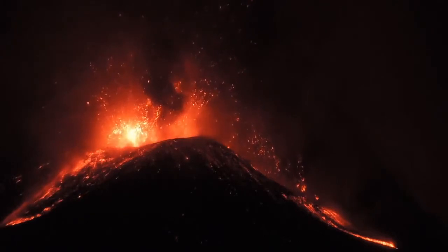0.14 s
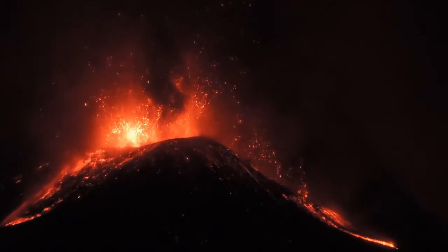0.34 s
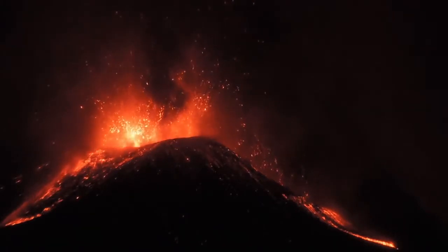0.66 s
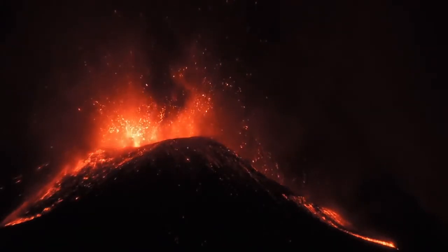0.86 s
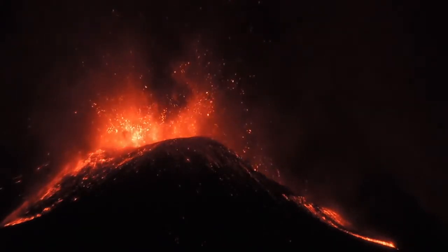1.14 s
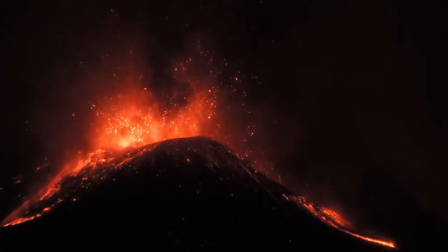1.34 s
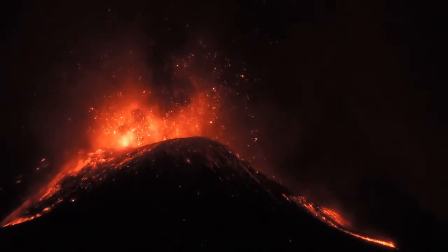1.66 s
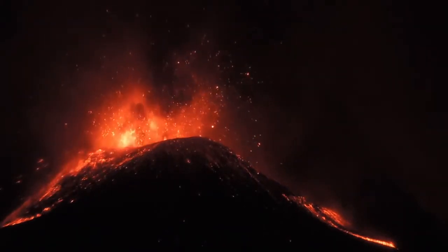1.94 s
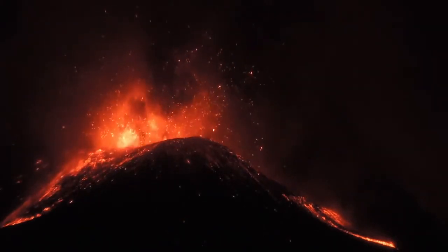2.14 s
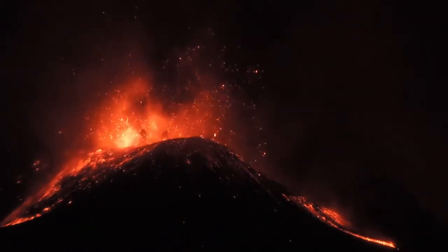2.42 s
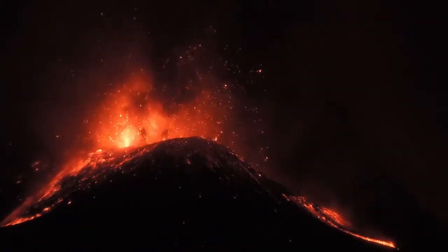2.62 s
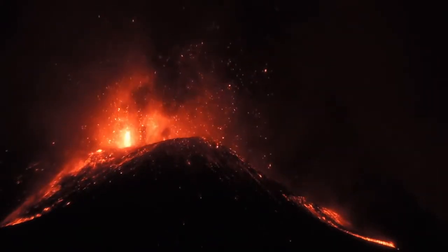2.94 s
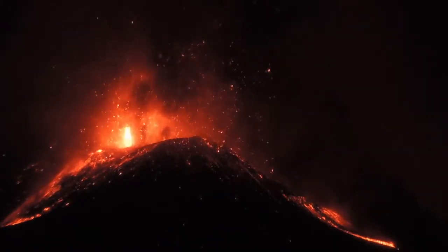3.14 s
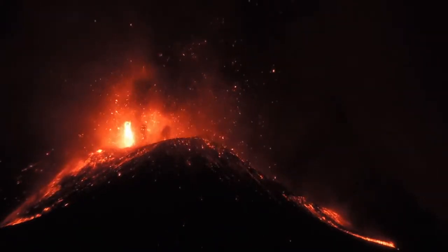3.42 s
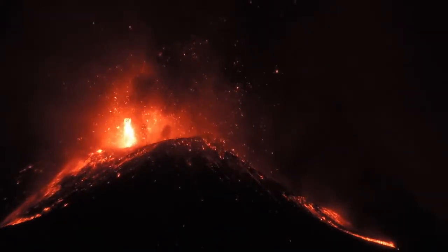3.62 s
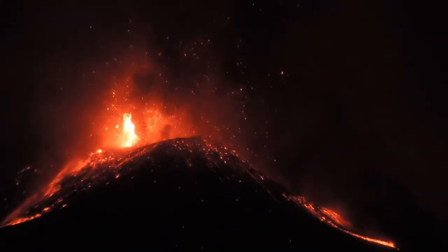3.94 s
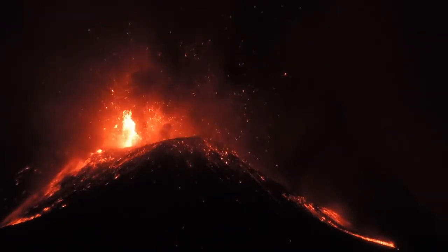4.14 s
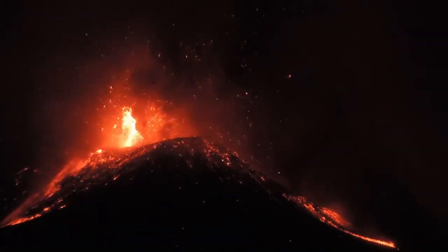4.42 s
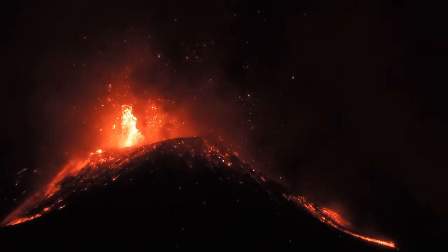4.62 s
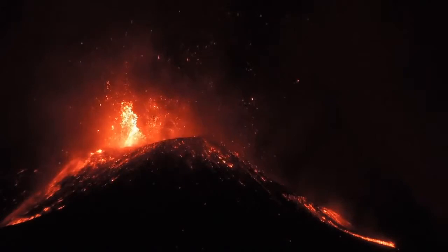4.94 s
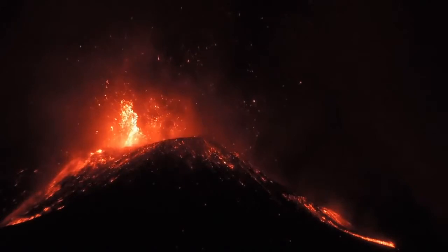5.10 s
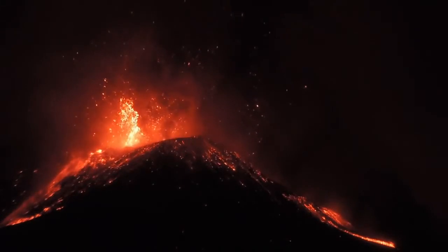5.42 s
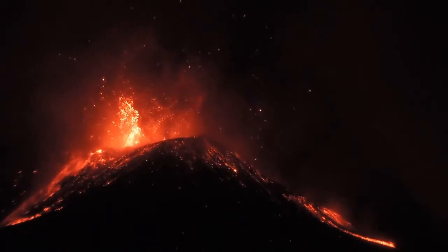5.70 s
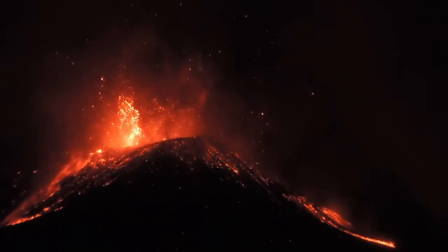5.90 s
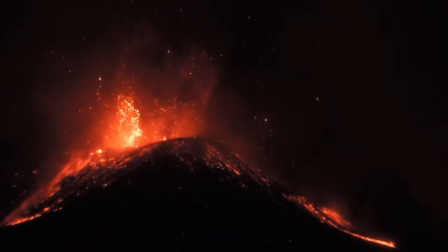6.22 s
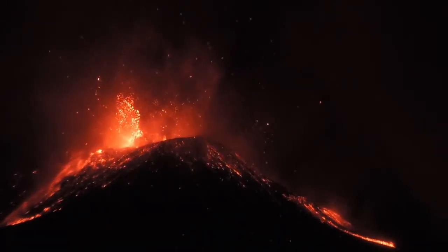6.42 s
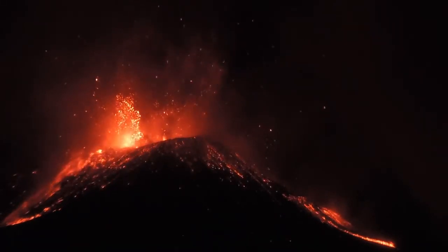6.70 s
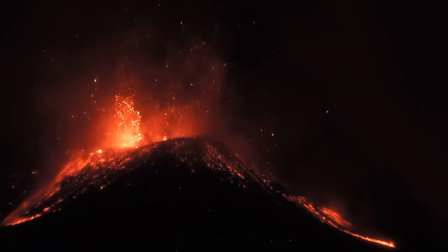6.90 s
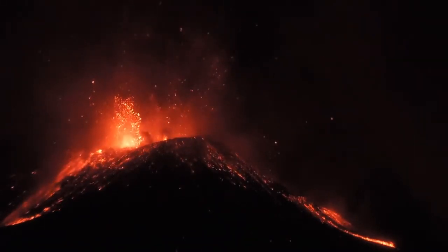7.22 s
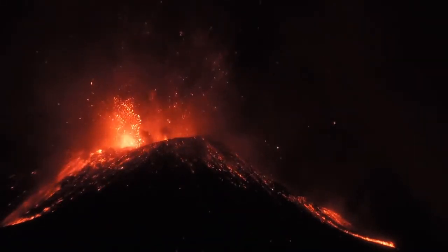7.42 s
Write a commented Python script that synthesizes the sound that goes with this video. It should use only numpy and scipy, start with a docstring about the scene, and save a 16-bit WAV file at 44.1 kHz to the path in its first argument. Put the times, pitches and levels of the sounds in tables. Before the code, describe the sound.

A distant volcano rumbles and roars in rolling low bursts, peaking in one heavy boom midway, while ash grains tick sharply close by over faint hiss.

```python
"""Out in the open at night, kilometres from an erupting volcano, on a stereo microphone.
Gas bursts in the vent, random pulses shaped by spectra, merge into a rolling rumble, a duller-than-near
jet roar and a deep swell; single booms, damped vibrations, stand out, all treble lost on the way.
Close by, grains of ash tick on the gear as short rings and snaps, mostly to the right.
Behind it all lies a fine steady hiss of noise in flickering octave bands."""
import sys
import numpy as np
from scipy import signal
from scipy.fft import rfft, irfft, next_fast_len
from scipy.io import wavfile
from scipy.ndimage import uniform_filter1d

SR = 44100
rng = np.random.default_rng(int(sys.argv[2]) if len(sys.argv) > 2 else 0)


def digitize_waveform(pressure):
    """Quantize a signal to 16-bit integers and store it at the path in sys.argv[1].

    Rows of a 2-D input are taken as channels; values are limited to [-1, 1].
    """
    field = np.atleast_2d(pressure).T
    bounded = np.clip(field, -1, 1)
    quanta = np.round(bounded * 32767).astype(np.int16)
    wavfile.write(sys.argv[1], SR, quanta)


N = 333172  # samples

# Blasts in the distant vent: peak_s, rise_s, rumble_db, roar_db, rumble_fade_db_per_s
VENT_BLASTS = [(0.06, 0.13, -43, -52, 16), (0.27, 0.24, -44.5, -72, 24), (0.71, 0.46, -40.5, -49.5, 7),
               (0.9, 0.22, -35.5, -49.5, 29), (2.14, 0.14, -46, -49, 11), (2.27, 0.18, -44, -46, 29),
               (3.13, 0.39, -48, -53.5, 12), (3.795, 0.028, -43.5, -48, 9), (3.86, 0.06, -43, -48.5, 14),
               (3.95, 0.071, -37.5, -45, 7), (4.07, 0.16, -36, -41.5, 10.5),
               (4.17, 0.063, -26.5, -36.5, 21), (4.4, 0.12, -34, -57, 17), (4.57, 0.12, -31.5, -52.5, 21),
               (4.76, 0.13, -47, -57, 18), (5.72, 0.074, -55, -56.5, 17), (5.87, 0.13, -38.5, -49.5, 19),
               (6.14, 0.34, -36, -48.5, 37), (6.36, 0.27, -39, -47.5, 21), (6.58, 0.16, -37.5, -50, 12),
               (6.78, 0.25, -37.5, -52.5, 10), (7.0, 0.15, -36, -42.5, 28), (7.15, 0.12, -51, -53.5, 9)]
RISE_DB = 13  # climb during the rise
ECHO_DB, ECHO_FADE_DB_PER_S = -15, 12.7


def surge(peak_db, calm_db, fades=1):
    """Level in dB of a layer: blasts climb, fade and echo off far slopes; powers add over a calm bed."""
    t = np.arange(0, N, 64) / SR
    power = undb(2 * calm_db)
    for (peak_s, rise_s, _, _, fade), db in zip(VENT_BLASTS, peak_db):
        age = t - peak_s
        since_peak = age.clip(0)
        direct = undb(-2 * fades * fade * since_peak)
        # the slopes' return is a weaker tail that fades at its own rate
        echo = undb(2 * (ECHO_DB - fades * ECHO_FADE_DB_PER_S * since_peak))
        climb_db = RISE_DB * np.minimum(age / rise_s, 0)
        power = power + undb(2 * (db + climb_db)) * (direct + echo)
    return np.interp(np.arange(N) / SR, t, 10 * np.log10(power))


# Spectrum of the rumble as it arrives, relative: pitch_hz, density_db (per Hz)
RUMBLE_SPECTRUM = [(21, -41), (35, -10), (77, -2.5), (97, -1), (129, -4), (168, -5.5), (199, -12),
                   (263, -19.5), (280, -27.5), (360, -35), (620, -120)]
FRESH_ROAR_DB, TILT_PER_DB = -15, 0.55  # roar over rumble at no tilt, tilt in dB per dB beyond it
FAR_ROLL_DB = -56.5  # gain of a steady dull roll under everything


def distant_rumble(rumble_db, roar_db):
    """A crowd of low gas bursts, brighter the more roar there is over it, with a steady dull roll."""
    rumble = bursts(3000, 0.33, RUMBLE_SPECTRUM, side_db=-18.0)
    # fresh blasts sound brighter, their late echoes off far slopes duller
    dull = colour(rumble, [(70, 3.5), (110, -12), (200, -50)])
    bright = rumble - dull
    tilt_db = TILT_PER_DB * (roar_db - rumble_db - FRESH_ROAR_DB)
    rolling = undb(rumble_db) * (undb(-tilt_db / 2) * dull + undb(tilt_db / 2) * bright)
    return rolling + undb(FAR_ROLL_DB) * dull


# Spectrum of the jet roar as it arrives, relative: pitch_hz, density_db (per Hz)
ROAR_SPECTRUM = [(160, -9), (270, -11), (307, -4.5), (380, -2.5), (449, -4.5), (523, -9.5), (565, -14.5),
                 (720, -27.5), (940, -29), (1580, -120)]
EDGE_PER_DB, EDGE_FROM_DB = 0.05, -51  # lift of the upper edge in dB per dB over this level


def jet_roar(roar_db):
    """Denser, higher gas bursts, a little left; the harder the jet blows, the stronger its upper edge."""
    roar = bursts(4000, 0.56, ROAR_SPECTRUM, side_db=-22)
    edge = colour(roar, [(330, -34), (420, 2), (600, -3.0)])
    edge_gain = undb(EDGE_PER_DB * (roar_db - EDGE_FROM_DB)) - 1
    lean_db = np.array([[.6], [-.6]])
    return undb(roar_db + lean_db) * (roar + edge_gain * edge)


# Single bursts that stand out of the rumble: start_s, peak_db, pitch_hz
SINGLE_BOOMS = [(0.055, -36.5, 126), (0.65, -36.5, 92), (0.8, -38, 58), (0.871, -28, 97.5),
                (0.97, -37, 56.6), (1.72, -43, 62.6), (2.2, -41, 66), (2.24, -48, 560), (2.453, -44, 100),
                (3.414, -44, 182), (3.546, -44, 62.3), (3.785, -49, 477), (3.83, -44, 383),
                (3.829, -35.5, 91), (3.913, -30, 103), (4.1, -36, 403), (4.152, -19, 83.7),
                (4.165, -34.5, 566), (4.156, -29, 445), (4.226, -21, 150), (4.241, -34, 200),
                (4.244, -29, 450), (4.544, -31, 64), (4.684, -36, 53), (4.76, -31.5, 76.4),
                (5.828, -30.5, 92), (6.332, -34.5, 75), (6.62, -43, 81.6), (6.7, -30, 79.4),
                (6.81, -35.5, 65.5), (6.97, -24.5, 99.4), (6.992, -33.5, 370), (7.03, -44, 437)]
BOOM_CYCLES, BOOM_RISE_CYCLES = 12, 3.5  # vibrations to fall 60 dB, and in the onset's time constant


def booms():
    """Single bursts, each a damped vibration that swells and dies over a set number of cycles."""
    out = np.zeros((2, N))
    for start_s, peak_db, hz in SINGLE_BOOMS:
        boom = ring(hz, t60=BOOM_CYCLES / hz, rise=BOOM_RISE_CYCLES / hz)
        add(out, start_s, undb(peak_db) * boom)
    return out


# Level of the deepest swell, more felt than heard: time_s, level_db
DEEP_LEVEL = [(0, -59), (2.1, -55), (3.5, -61), (3.9, -48.5), (4.3, -41.5), (4.55, -43), (5.1, -49),
              (6.4, -56), (6.8, -45.5), (7.55, -50)]


def deep_swell():
    """Sparser bursts shaped to the lowest pitches, following a drawn level."""
    deep_db = np.interp(np.arange(N) / SR, *np.transpose(DEEP_LEVEL))
    spectrum = [(3, -12), (10, 17), (22, 21.0), (45, -14), (65, -37.0)]
    return undb(deep_db) * bursts(400, 0.45, spectrum, side_db=-4)


def vent():
    """The far vent: each blast drives rumble and jet roar together, the roar fading faster."""
    _, _, rumble_peak_db, roar_peak_db, _ = np.transpose(VENT_BLASTS)
    rumble_db = surge(rumble_peak_db, calm_db=-63)
    roar_db = surge(roar_peak_db, calm_db=-62.5, fades=2.24)
    return deep_swell() + distant_rumble(rumble_db, roar_db) + jet_roar(roar_db) + booms()


BODY_HZ, BODY_DB = 820, -11.5  # the housing's low mode under each knock
BOUNCE_S, BOUNCE_DB = 0.00287, -19  # second, softer knock
SNAP_FADE_MS = 0.85  # time constant


def grain(knock_hz, knock_db, click_hz, click_db, snap_db, pan_db, noise):
    """A grain knocks the housing for a few cycles, bounces, clicks, and shatters in a short bright snap."""
    knock = ring(knock_hz, t60=0.0029, rise=0.00015)
    body = ring(BODY_HZ, t60=len(knock) / SR, rise=0.0002)[:len(knock)]
    knock = knock + undb(BODY_DB) * body
    click = ring(click_hz, t60=0.0017, rise=0.00025)
    side_db = np.array([[pan_db / 2], [-pan_db / 2]])

    # after the sharp first contact, the right adds crackle of its own to a share of the left's
    fade = np.exp(-1000 * np.arange(noise.shape[1]) / SR / SNAP_FADE_MS)
    shatter = (noise + 0.85 * noise[0]) * fade
    shatter[:, 1] += 2.5
    out = undb(snap_db + side_db) * np.diff(shatter, 2)  # differencing brightens the snap

    # the housing shades the bright parts from the far side more than the low knock
    out[:, :len(knock)] += undb(knock_db + 0.29 * side_db) * knock
    bounce = int(BOUNCE_S * SR)
    out[:, bounce:bounce + len(knock)] += undb(knock_db + BOUNCE_DB + 0.29 * side_db) * knock
    out[:, :len(click)] -= undb(click_db + 0.32 * side_db) * click
    return out


# Ash grains on the gear: start_s, knock_hz, knock_db, click_hz, click_db, snap_db,
# pan_db (left minus right in the snap; knock and click lean less)
ASH_GRAINS = [(0.0189, 1350.0, -47, 3260.0, -44, -51.5, -9), (0.0424, 1560, -37.5, 4590.0, -53, -45.5, -11),
              (0.2081, 1140.0, -46, 3990.0, -47, -56, -7.0), (0.2429, 1310.0, -58, 3560, -43, -48, -7),
              (0.2622, 1760.0, -58.0, 4790.0, -58.0, -51, -4.0),
              (0.3744, 1900.0, -49.0, 4320.0, -46, -57, -13), (0.4342, 1400.0, -44, 6030, -40, -52, 0.0),
              (0.5823, 1730.0, -56, 3580.0, -41.5, -63.5, -4.0),
              (0.596, 1280.0, -44, 5400.0, -52, -57, -4.0), (0.7314, 1630.0, -66, 4680.0, -40, -57, 0.0),
              (0.771, 1060, -58, 4000, -53, -53, -5), (0.782, 1630.0, -58.0, 3070.0, -46, -53, 4.0),
              (0.9394, 1470.0, -42, 3480.0, -47, -53, -5.0), (1.0478, 1520, -34.5, 4160, -39, -43.5, -10),
              (1.051, 1690, -38, 3300, -56, -62, -8), (1.154, 1330.0, -43, 3620.0, -45, -52, -6.0),
              (1.252, 1520, -40, 3890.0, -48, -50, -10.0), (1.2598, 1980.0, -51, 3240.0, -40, -49, -8),
              (1.3442, 1720, -41.0, 6300, -48, -38.5, -8), (1.5068, 1030.0, -37, 3470.0, -60, -68.0, -1.0),
              (1.5926, 1700.0, -60, 3010.0, -54, -53, -3.0), (1.9968, 2090.0, -45, 4700.0, -45, -57, -2.0),
              (2.045, 1630.0, -58.0, 5020.0, -52, -51, -3), (2.1748, 1500, -38.5, 3050.0, -42, -45, -11),
              (2.261, 2040.0, -49, 5360.0, -54, -47, -14), (2.3753, 1330, -33.5, 3720.0, -63, -52.5, -11),
              (2.4607, 2140.0, -60, 3200.0, -42, -63.0, -7.0),
              (2.559, 2070.0, -54, 3280.0, -49, -50.5, -18), (2.5923, 1230.0, -47.0, 5300.0, -60, -55, -10),
              (2.612, 1230.0, -60, 5340.0, -61, -47, -13), (3.0965, 1500, -44, 3500, -46, -56, -7),
              (3.1098, 1150.0, -39, 3460, -46, -62.0, -8.0), (3.2625, 1180, -39, 4190.0, -47, -66, -8),
              (3.3669, 1490, -37.0, 3750, -39, -49, -10), (3.488, 1400, -39, 3500, -53, -73, 0),
              (3.518, 1420.0, -38.5, 5560.0, -50, -46.5, -9),
              (3.6907, 1390.0, -58.0, 4290.0, -44, -51.0, 2), (3.74, 1020.0, -55, 6220.0, -60, -55, -14),
              (3.8512, 1030.0, -46, 6330, -42.5, -46, -7), (3.8865, 1740.0, -47, 3240.0, -44, -58, -16.0),
              (3.8927, 1720.0, -43, 4320.0, -49, -52.5, -5.0),
              (3.9027, 2150.0, -44, 4510.0, -49, -56, -11.0), (4.084, 940.0, -58, 5930.0, -55, -52, -1.0),
              (4.1496, 1900, -40, 3700, -50, -52, 0), (4.1632, 1200.0, -58.0, 3480, -35.5, -61.0, -7.0),
              (4.2724, 1580, -30.5, 3540.0, -66, -61, -5), (4.2782, 1750, -42, 3000, -56, -64, -5),
              (4.2918, 1500, -48, 6500, -54, -51, -17), (4.3528, 1780.0, -42, 4760.0, -53, -60, -32),
              (4.3618, 1690.0, -38, 4420, -42, -49, -11), (4.4329, 1070.0, -52.0, 3880.0, -50, -51, 4.0),
              (4.4437, 1380, -59, 5000, -50, -52, -2), (4.539, 1600, -45, 2900, -50, -68, -20),
              (4.7495, 1120.0, -43, 4030.0, -44, -50, -3.0), (4.7606, 1250.0, -38.5, 3540.0, -46, -60, -6),
              (4.9454, 1760.0, -57, 3950.0, -51, -52.5, -9),
              (5.0004, 2140.0, -58.0, 5070.0, -58.0, -52, -3.0),
              (5.0094, 1980.0, -67, 4860.0, -47, -52.0, 2), (5.0716, 2010.0, -60, 4750.0, -46, -51, -11),
              (5.1271, 1370.0, -42, 5530, -45, -55, -6.0), (5.1926, 1240.0, -41, 4370, -44, -49, -10),
              (5.2702, 1940.0, -44, 3510.0, -58.0, -58, -4.0), (5.2754, 1660.0, -54, 3710.0, -44, -50, 5),
              (5.487, 1960, -44, 3300, -41, -54, -10), (5.5408, 1120.0, -40.5, 4520.0, -48, -54, 0),
              (5.7976, 1430.0, -58.0, 4550.0, -56, -51, -2), (5.8527, 870.0, -58.0, 5160.0, -47, -50, -11),
              (6.0032, 980.0, -58.0, 3570.0, -53.0, -56, 4),
              (6.128, 1460.0, -55, 3360.0, -50.0, -51.5, -8.0),
              (6.2187, 1630.0, -60, 6380.0, -52, -54, 0.0), (6.4618, 1080.0, -38.5, 5500, -42.5, -52, 1.0),
              (6.635, 1500, -54, 3800, -48, -66, -3), (6.7112, 1080.0, -41.5, 5390.0, -51, -46, -3),
              (6.7819, 1450.0, -53, 3600.0, -58.0, -52, -12), (6.8131, 844, -40, 4000, -48, -64, 5),
              (7.0232, 1520.0, -58.0, 5970.0, -58.0, -52, -1.0),
              (7.0573, 1620.0, -56, 4830.0, -47, -54, 1.0), (7.0667, 1400.0, -47, 3760.0, -45, -51, -6.0),
              (7.1075, 1870.0, -45, 3760.0, -44, -55, -8.0), (7.1572, 1350, -41, 3500, -52, -62, -5),
              (7.1603, 2070, -42, 5200, -41, -54, -5.0), (7.177, 1450, -33.0, 4170, -36, -54.0, -6.0),
              (7.2032, 1500, -60, 4400, -48, -60, -5), (7.221, 1400, -39, 4000, -50, -62, -3),
              (7.2249, 1120.0, -44, 5180.0, -54.0, -58.0, -13.0),
              (7.2482, 1340.0, -55, 3910.0, -58.5, -47.5, -14),
              (7.2843, 1490.0, -64, 4780.0, -46, -54, -6.0), (7.4186, 1230.0, -56, 3000.0, -46, -58, -2),
              (7.4378, 1660, -41, 4480, -41, -50, 7), (7.4414, 1810.0, -36.5, 6200, -38, -50, -2),
              (7.4583, 1580.0, -47, 5300, -38, -46, -10)]


def loud_grains():
    """The loudest grains close to the microphone, struck one by one."""
    out = np.zeros((2, N))
    noises = rng.standard_normal((len(ASH_GRAINS), 2, 600))
    for (start_s, *voice), noise in zip(ASH_GRAINS, noises):
        add(out, start_s, grain(*voice, noise))
    return out


PATTER_DB, PATTER_SPREAD_DB = -58, 5  # gain of the smallest grains, and how far others exceed it


def patter():
    """Small grains of random voice, in flurries: their times follow a wavering fall rate."""
    out = np.zeros((2, N))
    fallen = np.cumsum(undb(4.5 * walk(5)))
    fallen = fallen / fallen[-1]
    small = rng.random((150, 7))
    noises = rng.standard_normal((len(small), 2, 600))
    for (share, size, low, high, tilt, shine, side), noise in zip(small, noises):
        knock_hz, knock_db = 900 + 1600 * low, -3 + 10 * tilt
        click_hz, click_db = 2500 + 3500 * high, -3 + 9 * high
        snap_db, pan_db = -15 + 12 * shine, 12 * side - 9
        sound = grain(knock_hz, knock_db, click_hz, click_db, snap_db, pan_db, noise)
        start_s = np.interp(share, fallen, np.arange(N) / SR)
        add(out, start_s, undb(PATTER_DB + PATTER_SPREAD_DB * size ** 2) * sound)
    return out


def ash():
    """Ash ticking on the gear: the loud grains over the random patter."""
    return loud_grains() + patter()


# Spectrum laid over the hiss, relative: pitch_hz, density_db (per Hz)
HISS_SPECTRUM = [(100, -1), (300, -5.5), (1180, -5.5), (1400, -7.5), (2100, -8), (2700, -11), (3410, -14),
                 (10300, -20.5), (12900, -20), (13500, -16), (14000, -40), (15000, -70)]
HISS_DB = -53  # mean level at the microphone
SWELL_DB, SIZZLE_DB, FLICKER_DB = 0.25, 1.04, 0.4  # depth per unit of random walk


def hiss():
    """Noise, unrelated left and right; octaves swell and sizzle together and flicker alone, the top most."""
    out = 0
    swell = walk(6.9)
    sizzle = np.array([walk(90), walk(90)])  # left, right
    for octave in range(6):
        hz = 350 * 2 ** octave
        shape = [(hz / 2, -40), (hz / 1.534, -3), (hz, 0), (hz * 1.365, -3), (hz * 2, -40)]
        band = colour(rng.standard_normal((2, N)), shape)
        flicker_db = (FLICKER_DB + 0.11 * octave) * walk(14)
        lean_db = 1.1 - 0.21 * octave  # duller on the left
        side_db = np.array([[lean_db], [-lean_db]])
        out = out + band * undb(flicker_db + SWELL_DB * swell + SIZZLE_DB * sizzle + side_db)
    return level(colour(out, HISS_SPECTRUM), HISS_DB)


def bursts(rate, spread_db, points, side_db):
    """Scattered pressure pulses of uneven size; slopes scatter an unrelated share to the sides."""
    hit = rng.random((2, N)) < rate / SR  # rate in pulses per s
    size = undb(spread_db * rng.exponential(size=(2, N)))
    pulses = hit * rng.standard_normal((2, N)) * size
    mid, side = colour(pulses, points)
    return level(mid, 0) + level(side, side_db) * np.array([[1], [-1]])


def ring(hz, t60, rise):
    """A damped vibration with a soft onset, peak 1; t60 and the rise's time constant in s."""
    t = np.arange(int(1.2 * t60 * SR) + 8) / SR
    decay = np.exp(-np.log(1000) * t / t60)
    onset = -np.expm1(-t / rise)
    x = np.sin(2 * np.pi * hz * t) * decay * onset
    return x / np.max(np.abs(x))


def walk(rate):
    """Random levels held 1 / rate s and slewed twice."""
    k = int(SR / rate)
    steps = np.repeat(rng.standard_normal(N // k + 1), k)
    return 1.1 * uniform_filter1d(uniform_filter1d(steps, k), k)[:N]


def colour(x, points):
    """Shapes x by a spectrum of (Hz, dB) points, joined along log frequency."""
    hz, db = np.transpose(points)
    size = next_fast_len(N)
    f = np.arange(size // 2 + 1) * SR / size + 1  # 1 Hz up, to keep the log finite
    gain = undb(np.interp(np.log(f), np.log(hz), db))
    return irfft(rfft(x, size) * gain, size)[..., :N]


def undb(db):
    """Amplitude factor of a level in dB."""
    return 10 ** (np.asarray(db) / 20)


def level(x, db):
    """Scales x to an RMS level in dB."""
    return x * undb(db) / np.sqrt(np.mean(x ** 2))


def add(out, s, sound):
    """Mixes a short sound into both channels from time s."""
    i = int(s * SR)
    out[:, i:i + sound.shape[-1]] += sound[..., :N - i]


def scene():
    """The far vent, the ash on the gear and the hiss together."""
    return vent() + ash() + hiss()


def record(dry):
    """The capsule fades above its last resonance and the recorder cuts the top."""
    dry = colour(dry, [(20, 1.5), (12000, -7.5), (13300, -8), (14200, -15), (15200, -34)])
    top_cut = signal.ellip(8, .2, 70, 15600, fs=SR, output="sos")  # order, ripple dB, stop dB, Hz
    return signal.sosfilt(top_cut, dry)


dry = scene()
out = record(dry)
digitize_waveform(out)
```